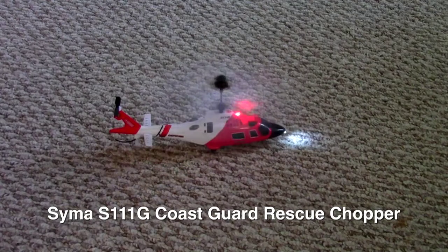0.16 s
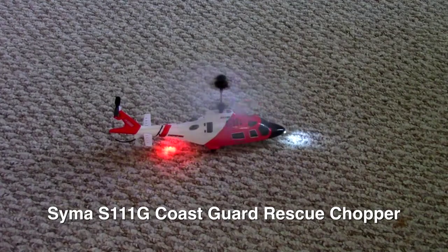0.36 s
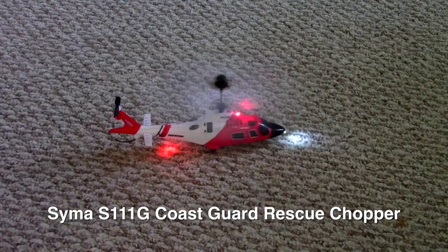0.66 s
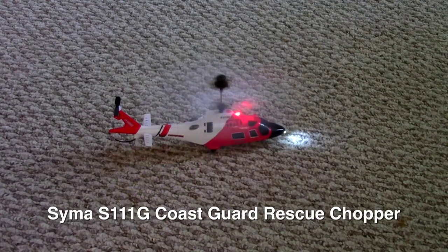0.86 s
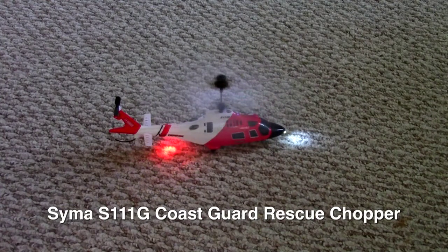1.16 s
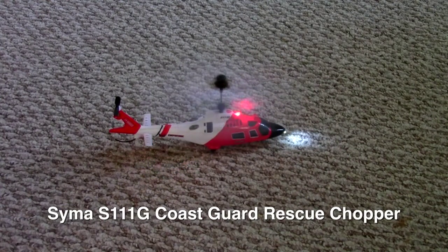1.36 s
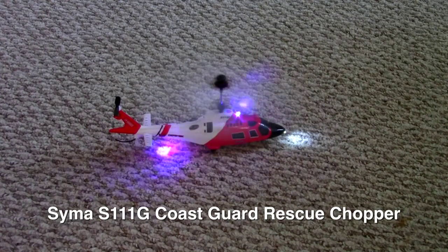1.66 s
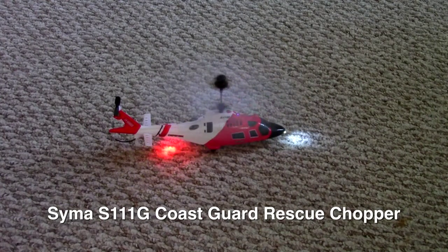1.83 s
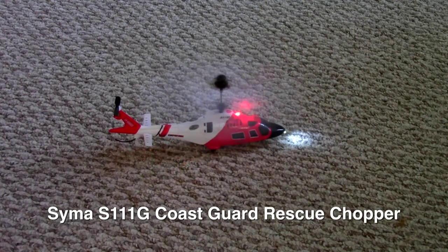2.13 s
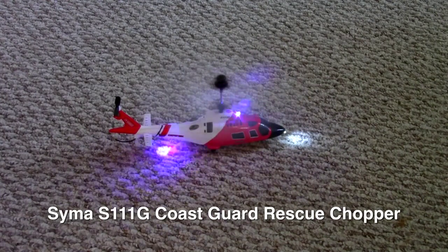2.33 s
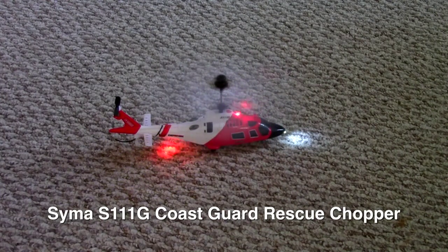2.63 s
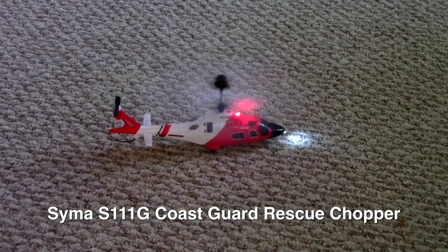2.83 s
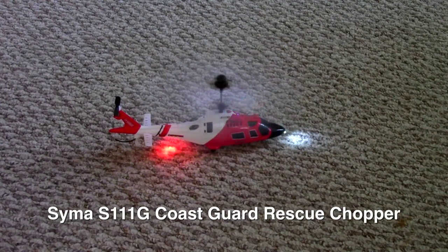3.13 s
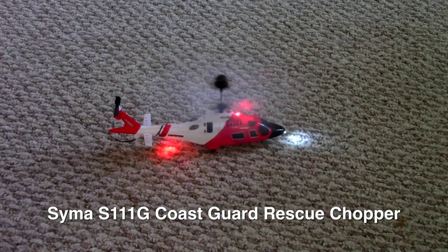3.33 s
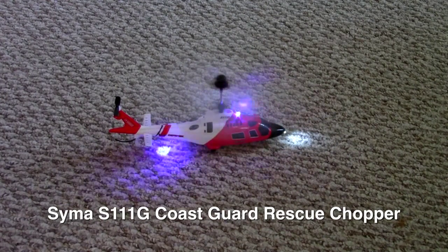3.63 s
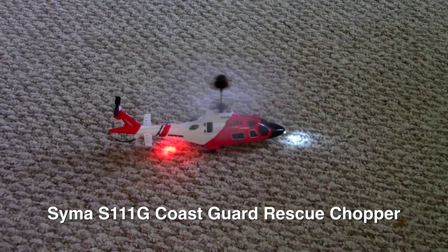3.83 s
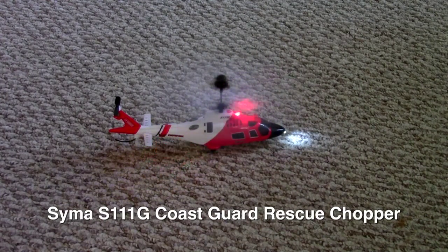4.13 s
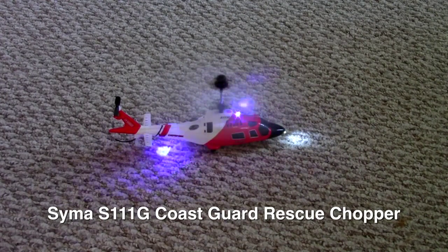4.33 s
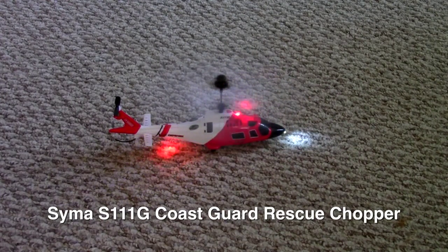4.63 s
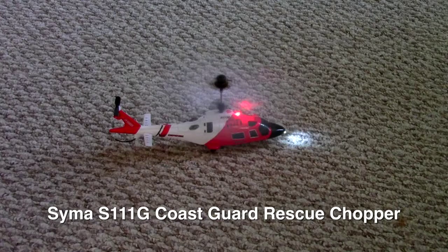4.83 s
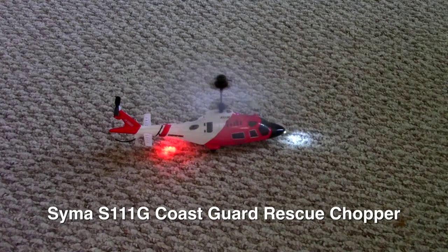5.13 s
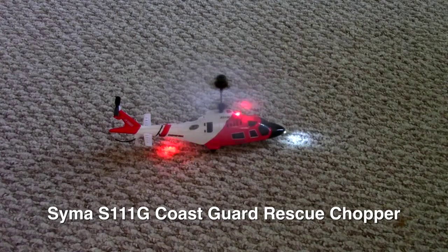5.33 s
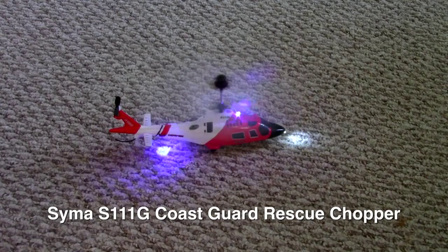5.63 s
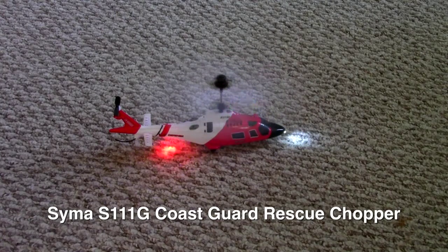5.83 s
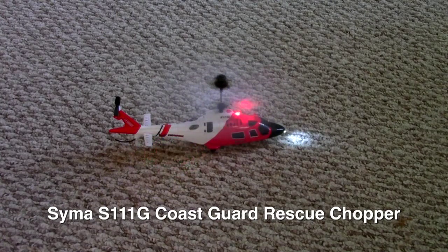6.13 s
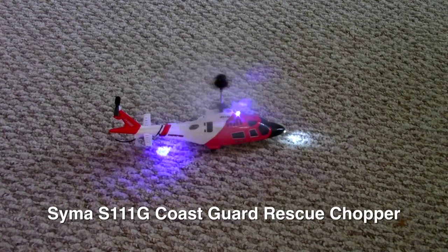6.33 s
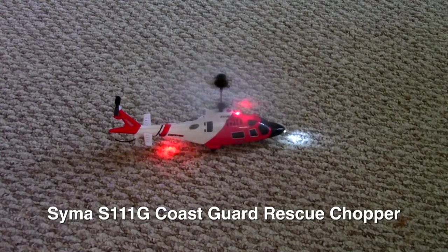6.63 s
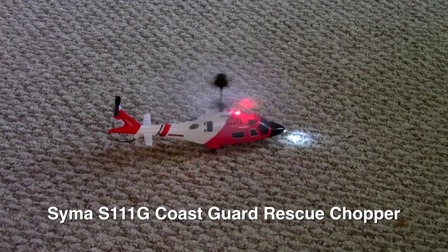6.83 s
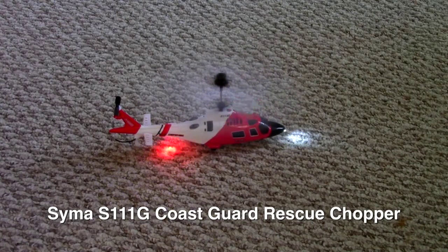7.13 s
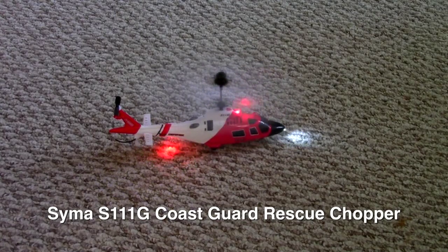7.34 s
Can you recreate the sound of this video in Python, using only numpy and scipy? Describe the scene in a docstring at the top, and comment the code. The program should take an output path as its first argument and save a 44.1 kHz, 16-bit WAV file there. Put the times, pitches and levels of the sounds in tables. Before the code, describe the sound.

A toy helicopter's geared motors whir continuously near the microphone in a small carpeted room. The soft opening swells fast into a buzzing, rasping treble whir with thin electric whine and light rotor air. The pitch stays nearly level for several seconds, then rises steadily and gets harsher, still running at the end. A distant machine hums very faintly.

```python
"""A toy helicopter runs its two geared motors up to a steady whir, then faster still.
Gear teeth click and rub in the plastic body; shafts and meshes add tones and smeared buzz.
Rotor air and motor brushes are shaped noise, the coil whine is harmonics of the drive switching rate,
and brief squeals glide up as the shafts come up to speed.
A machine elsewhere in the house hums faintly, its partials swelling and sinking over low rumble."""
import sys
import numpy as np
from scipy import signal
from scipy.fft import rfft, irfft, next_fast_len
from scipy.io import wavfile

SR = 44100
rng = np.random.default_rng(int(sys.argv[2]) if len(sys.argv) > 2 else 0)


def digitize_waveform(pressure):
    """Quantize a signal to 16-bit integers and store it at the path in sys.argv[1].

    Rows of a 2-D input are taken as channels; values are limited to [-1, 1].
    """
    field = np.atleast_2d(pressure).T
    bounded = np.clip(field, -1, 1)
    quanta = np.round(bounded * 32767).astype(np.int16)
    wavfile.write(sys.argv[1], SR, quanta)


N = 329982
TIME_S = np.arange(N) / SR
FFT_SIZE = next_fast_len(N)
BINS_HZ = np.maximum(np.arange(FFT_SIZE // 2 + 1) * SR / FFT_SIZE, 1)
CRUISE_TURNS_PER_S, TOP_TURNS_PER_S = 325, 415
PINION_TEETH, GEAR_TEETH = 7, 92


def from_db(db):
    """Decibels to gain."""
    return 10 ** (np.asarray(db) / 20)


def rms(x):
    """Root mean square."""
    return np.sqrt(np.mean(x ** 2) + 1e-20)


def in_time(rows):
    """Interpolate each column of a time table to every sample."""
    t_s, *columns = np.transpose(rows)
    return [np.interp(TIME_S, t_s, column) for column in columns]


def at_hz(points, hz):
    """Interpolate a spectrum on a log-frequency axis."""
    point_hz, point_db = np.transpose(points)
    return np.interp(np.log(hz), np.log(point_hz), point_db)


def colour(x, gain):
    """Filter by a gain per frequency bin."""
    return irfft(rfft(x, FFT_SIZE) * gain, FFT_SIZE)[..., :N]


def noise(spectrum):
    """Gaussian noise of a given spectrum, rms 1."""
    x = colour(rng.standard_normal(N), from_db(at_hz(spectrum, BINS_HZ)))
    return x / rms(x)


def drift(rate_hz):
    """Two-pole low-passed random walk about zero, rms 1, computed at SR / 40."""
    step = 40
    pole = np.exp(-2 * np.pi * step * abs(rate_hz) / SR)
    settle = 2000
    white = rng.standard_normal(N // step + settle + 2)
    slow = signal.lfilter([1], [1, -2 * pole, pole * pole], white)[settle:]
    return np.interp(np.arange(N) / step, np.arange(len(slow)), slow / rms(slow))


def sines(phase):
    """Sine of rms 1."""
    return np.sqrt(2) * np.sin(phase)


def shaft_turns(turns_per_s, flutter):
    """Integrate a slightly fluttering motor speed to turns made so far."""
    return np.cumsum(turns_per_s * (1 + flutter * drift(12))) / SR


def tooth_clatter(turns, wobble, blade_load, flaw_share, rub):
    """Each tooth clicks, over steady rubbing noise; the load swings with pinion and rotor angle."""
    teeth = turns * PINION_TEETH
    rotor_angle = 2 * np.pi * teeth / GEAR_TEETH
    count = int(teeth[-1])
    place = np.arange(count) % GEAR_TEETH
    # a tooth's own flaw returns every rotor turn, the backlash is new each time
    flaw = rng.standard_normal((2, GEAR_TEETH))[:, place]
    backlash = rng.standard_normal((2, count))
    share = np.clip(flaw_share, 0, 1)
    blow = np.sqrt(share) * flaw[0] + np.sqrt(1 - share) * backlash[0]
    force = np.tanh(blow)   # soft plastic limits the blow
    tooth = np.arange(count) + .2 * flaw[1] + .05 * backlash[1]
    sample = np.interp(tooth, teeth, np.arange(N)).astype(int)
    clicks = np.bincount(sample, force, N)
    contact = clicks / rms(clicks) + rub * rng.standard_normal(N)
    # four blades: load also swings 4 and 8 times a rotor turn
    blades = .75 * np.cos(rotor_angle) + np.sin(4 * rotor_angle) + 1.2 * np.cos(8 * rotor_angle)
    loaded = contact * (1 + wobble * np.cos(2 * np.pi * turns) + blade_load * blades)
    return loaded / rms(loaded)


def gear_tones(turns, tones, boost, waver_db, sway, slack):
    """Shaft and mesh tones; the eccentric rotor gear sways phase, slack teeth blur the high ones."""
    rotor_angle = 2 * np.pi * turns * PINION_TEETH / GEAR_TEETH
    blur = slack * (0.21 + boost) * drift(97)
    angle = 2 * np.pi * turns + sway * np.sin(rotor_angle) + blur   # rad
    out = 0
    for k, cruise_db, top_db in tones:
        level_db = cruise_db + boost * (top_db - cruise_db) + waver_db * drift(6.0)
        out = out + from_db(level_db) * sines(k * angle + rng.uniform(0, 2 * np.pi))
    return out


# Mesh vibration smeared by bouncing teeth, levels before the common buzz gain
# [f/motor rate, smear/Hz, level at cruise/dB, level at top speed/dB]
MESH_BUZZ = [(1, 25, -32, -22), (2.1, 70, -23, -19.5), (2.55, 70, -32, -23.5), (3.87, 45, -33, -24),
             (7.05, 70, -26, -19.5), (14.1, 90, -40, -21.5)]


def mesh_buzz(turns, boost):
    """Bouncing teeth smear the mesh tones: random quadrature amplitudes make gliding noise bands."""
    out = 0
    for k, smear_hz, cruise_db, top_db in MESH_BUZZ:
        angle = 2 * np.pi * k * turns
        band = drift(smear_hz) * np.cos(angle) + drift(smear_hz) * np.sin(angle)
        out = out + from_db(cruise_db + boost * (top_db - cruise_db)) * band
    return out


# Radiation slope of the plastic body, before normalising [f/Hz, level/dB]
BODY_SLOPE = [(100, -18.5), (330, -18.5), (550, -21), (900, -12.5), (1350, -18), (1650, -11), (2700, -3),
              (4700, -9), (7300, -9.5), (10700, -8.5), (12400, -28), (16000, -24)]
# Body resonances [f/Hz, width/Hz, level/dB]
BODY_MODES = [(1516, 445, 5.5), (1985, 89, -4), (2210, 670, 1.5), (2690, 160, 1.5), (2840, 45, 1.5),
              (3037, 42, 4.5), (3420, 79, -3), (3703, 374, 7.5), (4040, 360, 5), (4480, 180, -2),
              (5800, 510, 5), (6397, 670, 10.5), (7300, 410, -2.5), (8300, 690, 4.5), (9600, 230, -2.5),
              (13200, 900, 2), (14900, 700, 6)]


def body_gain():
    """Body slope plus resonances in dB; white noise keeps its power."""
    modes_db = sum(db / (1 + (2 * (BINS_HZ - hz) / width_hz) ** 2) for hz, width_hz, db in BODY_MODES)
    gain = from_db(at_hz(BODY_SLOPE, BINS_HZ) + modes_db)
    return gain / rms(gain)


# Tones of each drive, levels before the common tone gain
# [f/motor rate, level at cruise/dB, level at top speed/dB]
FIRST_TONES = [(1, -19, -8), (2, -15, -11.5), (2.125, -17.5, -10), (3, -15, -12), (4, -17.5, -21),
               (5, -20, -28), (6, -11.5, -18), (6.375, -13, -27), (7, -9.5, -18), (8, -16, -12),
               (8.5, -16, -14.5)]
SECOND_TONES = [(.64, -29, -13.5), (1, -17.5, -5.5), (1.999, -32, -17.5), (2.125, -30.5, -23),
                (3, -34, -14), (4, -21.5, -15), (5, -11.5, -37), (6.625, -22, -11.5), (7, -16, -16)]


def drives(speed, second_speed, first_db, second_db, tones_db, buzz_db):
    """Two gear trains shake one body; their tones grow as speed cubed up to cruise."""
    first = shaft_turns(speed, flutter=.0012)
    second = shaft_turns(second_speed, flutter=.002)
    clatter = from_db(first_db) * tooth_clatter(
        first, wobble=.18, blade_load=.12, flaw_share=.6, rub=.8)
    clatter += from_db(second_db) * tooth_clatter(
        second, wobble=0.046, blade_load=0.046, flaw_share=0.14, rub=0.63)
    # 0 at cruise, 1 at top speed
    boost = (speed - CRUISE_TURNS_PER_S) / (TOP_TURNS_PER_S - CRUISE_TURNS_PER_S)
    boost = np.clip(boost, 0, 1.25)
    load = np.minimum(speed / CRUISE_TURNS_PER_S, 1) ** 3
    tones = gear_tones(first, FIRST_TONES, boost, waver_db=1.6, sway=.07, slack=.09)
    tones += gear_tones(second, SECOND_TONES, boost, waver_db=2.5, sway=0.023, slack=0.059)
    buzz = mesh_buzz((first + second) / 2, boost)
    song = from_db(tones_db) * tones + from_db(buzz_db) * buzz
    return colour(clatter + load * song, body_gain())


# Squeals of the shafts coming up to speed; the first row is the faint mesh tone, 6.375 times the motor rate, at
# the start [peak t/s, half-width to 1/e/s, f at peak/Hz, glide/(Hz/s), level/dB]
SQUEALS = [(.12, .2, 1404, 149, -51.5), (.31, 0.16, 2580, 1913, -43), (0.658, .11, 8120, 4280, -37)]


def shaft_squeals(spread_hz):
    """Rising tones with jittered pitch under Gaussian envelopes."""
    out = 0
    for peak_s, half_s, hz, glide_hz_per_s, db in SQUEALS:
        pitch_hz = hz + glide_hz_per_s * (TIME_S - peak_s) + spread_hz * drift(250)
        envelope = np.exp(-((TIME_S - peak_s) / half_s) ** 2)
        out = out + from_db(db) * envelope * sines(2 * np.pi * np.cumsum(pitch_hz) / SR)
    return out


# Coil harmonics, levels before the common whine gain
# [f/switching rate, level with narrow pulses/dB, level with wide pulses/dB]
WHINE = [(2, -53, -46.5), (3, -44, -55), (7, -58, -63), (8, -50.5, -54), (9, -46.5, -50.5), (10, -47, -44),
         (11, -45, -48.5), (12, -52, -65), (13, -54.5, -62), (14, -67, -74), (15, -66, -60.5),
         (16, -73, -70), (17, -70, -65), (18, -66, -63), (19, -70, -71)]
SWITCHING_HZ = 816.4
NARROW_TURNS_PER_S, WIDE_TURNS_PER_S = 210, 455


def coil_whine(speed, whine_db, waver_db):
    """Switched current sings in the coils; pulse width follows speed and sets the harmonic mix."""
    width = (speed - NARROW_TURNS_PER_S) / (WIDE_TURNS_PER_S - NARROW_TURNS_PER_S)
    width = np.clip(width, 0, 1)
    phase = 2 * np.pi * np.cumsum(SWITCHING_HZ * (1 + 0.00032 * drift(7.9))) / SR
    out = 0
    for k, narrow_db, wide_db in WHINE:
        level_db = whine_db + narrow_db + width * (wide_db - narrow_db) + waver_db * drift(52)
        out = out + from_db(level_db) * sines(k * phase + rng.uniform(0, 2 * np.pi))
    return out


# Motor brush hiss, relative density [f/Hz, level/dB]
BRUSH_HISS = [(3000, -25), (5000, 19), (7000, -3), (10000, 2), (12000, 8), (13200, 0), (14700, 2),
              (15700, 8)]


def brush_hiss(level_db):
    """Brush friction as treble noise with a quick random waver in level."""
    return from_db(level_db + 3.3 * drift(40)) * noise(BRUSH_HISS)


# Rotor air, relative density [f/Hz, level/dB]
WASH = [(60, -6), (220, -19), (310, -14), (410, -0.5), (520, 1.5), (680, -0.5), (880, 4.5), (1200, -12),
        (2000, -34), (5000, -6)]


def rotor_wash(level_db):
    """Air stirred by the rotors as shaped noise."""
    return from_db(level_db) * noise(WASH)


# Diffuse rotor air and whir off the walls, relative density [f/Hz, level/dB]
DIFFUSE_AIR = [(30, -12), (90, 7), (180, 15.5), (400, 12), (750, 7), (1250, -0.5), (1600, -50), (2500, -90)]
DIFFUSE_WHIR = [(2000, -90), (2500, -39), (2850, 0.5), (3700, -7), (4700, 10.5), (5900, 15.5), (7000, 2),
                (7900, -10), (9000, 6.5), (10000, -2), (11600, 8.5), (14000, -1), (15000, -16)]


def diffuse_field(air_db, whir_db):
    """Scattered air and wall-reflected whir as noise for the side channel."""
    return from_db(air_db) * noise(DIFFUSE_AIR) + from_db(whir_db) * noise(DIFFUSE_WHIR)


# Hum swells, levels before the common hum gain [start t/s, end t/s, f/hum rate, level/dB]
SWELLS = [(.6, 2.4, 5, -51), (2.3, 2.8, 8, -50), (2.75, 3.7, 9, -53), (2.95, 3.5, 8, -46.5),
          (3.3, 4.36, 5, -50), (3.7, 4.12, 8, -49), (4.25, 5.2, 9, -52.5), (4.8, 5.25, 8, -47),
          (5.2, 7.7, 5, -53.5), (5.6, 6.65, 8, -49), (5.9, 8.5, 9, -53), (6.848, 7.45, 8, -50)]
SWELL_FADE_S = 0.13


def hum_level(multiple, steady_db):
    """Gain of one partial: swells fade in, hold and fade out above the steady floor."""
    level = from_db(steady_db)
    for start_s, end_s, k, db in SWELLS:
        if round(k) == multiple:
            edge_s = np.minimum(TIME_S - start_s, end_s - TIME_S)
            level = np.maximum(level, from_db(db) * np.clip(edge_s / SWELL_FADE_S, 0, 1))
    return level


# Steady hum partials, levels before the common hum gain [f/hum rate, level/dB]
HUM = [(4, -65), (5, -59), (6, -65), (8, -57), (9, -63), (10, -63.5)]
# Room rumble, relative density [f/Hz, level/dB]
RUMBLE = [(12, -38), (20, -17), (32, -8), (48, 0.5), (86, -2), (166, -5.5), (236, -21), (311, -10),
          (400, -8), (520, -25), (880, -70)]
HUM_RATE_HZ = 19.78


def room(rumble_db, hum_db, waver_db, wander_hz):
    """A distant machine's hum, multiples of one slow rate with wandering pitch, over rumble noise."""
    hum = 0
    for k, steady_db in HUM:
        phase = 2 * np.pi * np.cumsum(round(k) * HUM_RATE_HZ + wander_hz * drift(4.3)) / SR
        level = hum_level(round(k), steady_db) * from_db(waver_db * drift(6.2))
        hum = hum + level * sines(phase)
    return from_db(hum_db) * hum + from_db(rumble_db) * noise(RUMBLE)


# Drive effort as whir level, before the clatter offset [t/s, level/dB]
EFFORT = [(0.03, -42.5), (0.28, -34.5), (0.65, -29.5), (3.46, -27), (4.95, -27), (6.87, -25.5), (7.45, -25)]
# Motor speeds, parting and meeting as the throttle moves [t/s, first/(turns/s), second/(turns/s)]
MOTORS = [(0.0, 217.4, 220.6), (0.55, 297.2, 305.3), (1.06, 325.0, 322.3), (1.59, 330.7, 314.7),
          (2.63, 333.0, 314.3), (3.29, 326.3, 312.0), (4.16, 325.5, 310.9), (4.71, 328.4, 298.3),
          (5.06, 325.8, 311.4), (5.6, 361.3, 349.8), (6.05, 397.0, 392.7), (6.44, 411.7, 394.6),
          (7.01, 427.3, 415.7), (7.48, 440.5, 442.6)]


def scene():
    """Toy in the centre; diffuse air, whir and room sound also in the side channel."""
    whir_db, = in_time(EFFORT)
    speed, second_speed = in_time(MOTORS)
    octaves = np.log2(speed / CRUISE_TURNS_PER_S)
    # air and brush noise grow faster with speed than clatter
    clatter_db = whir_db - 1.3 - 1.7 * octaves
    wash_db = clatter_db - 16.5 + 14 * octaves
    brush_db = clatter_db - 20.0 + 17 * octaves
    toy = from_db(clatter_db) * drives(
        speed, second_speed, first_db=-0.62, second_db=-2.5, tones_db=-6.5, buzz_db=4.5)
    toy += shaft_squeals(spread_hz=135) + coil_whine(speed, whine_db=-0.3, waver_db=4.0)
    toy += brush_hiss(brush_db) + rotor_wash(wash_db)
    mid = toy + room(rumble_db=-57.5, hum_db=-2.05, waver_db=0.74, wander_hz=0.806)
    side = diffuse_field(air_db=wash_db - 12.5, whir_db=clatter_db - 21)
    side += room(rumble_db=-62.5, hum_db=-16.5, waver_db=4.0, wander_hz=1.55)
    return np.array([mid + side, mid - side])


def record(dry):
    """Steep low-pass."""
    cutoff_hz = 15700
    return colour(dry, 1 / np.sqrt(1 + (BINS_HZ / cutoff_hz) ** 400))


dry = scene()
out = record(dry)
digitize_waveform(out)
```